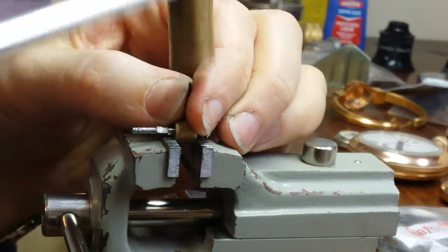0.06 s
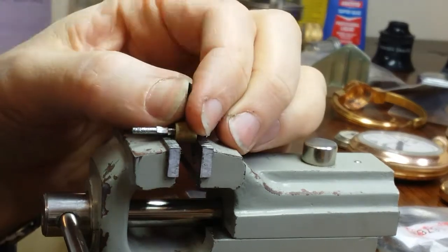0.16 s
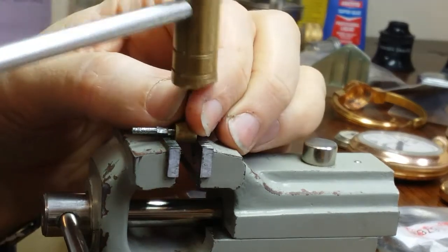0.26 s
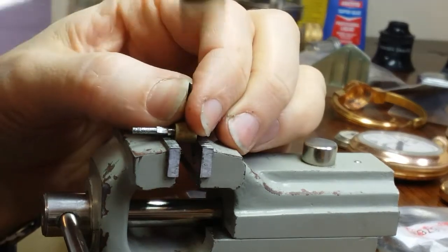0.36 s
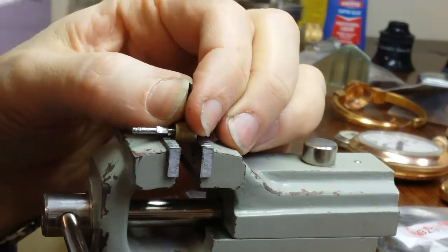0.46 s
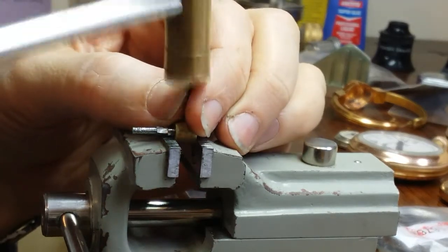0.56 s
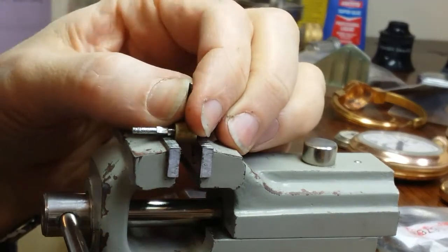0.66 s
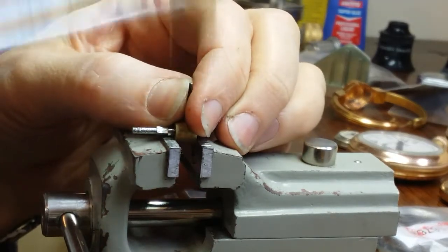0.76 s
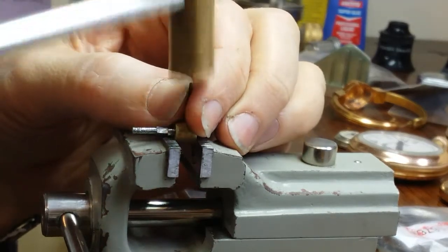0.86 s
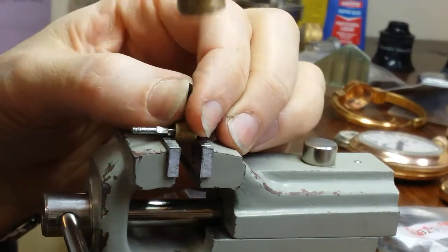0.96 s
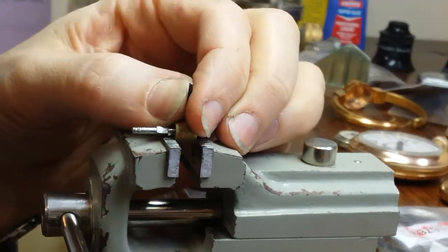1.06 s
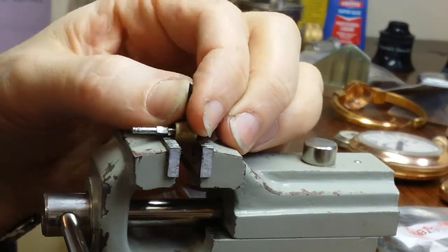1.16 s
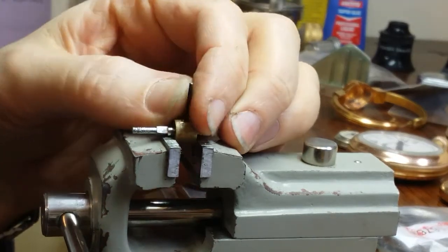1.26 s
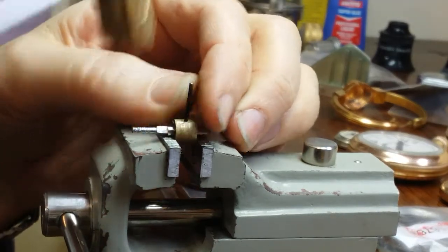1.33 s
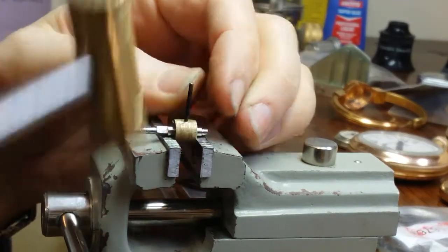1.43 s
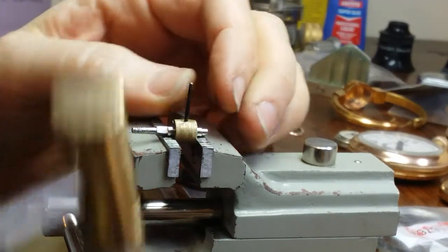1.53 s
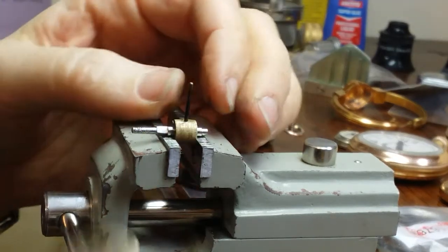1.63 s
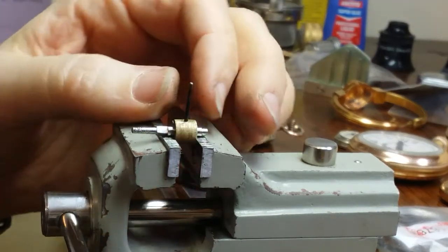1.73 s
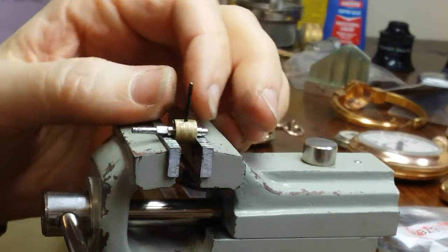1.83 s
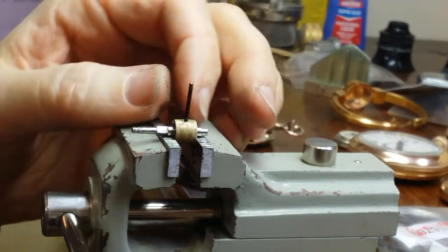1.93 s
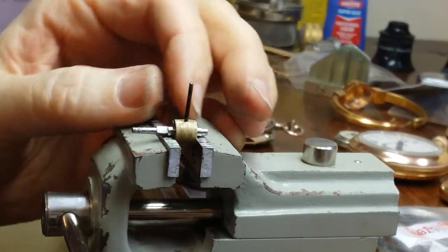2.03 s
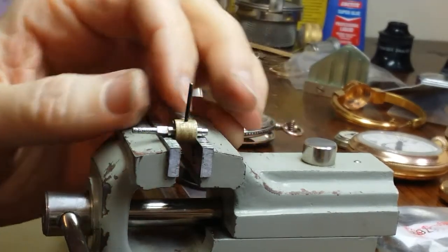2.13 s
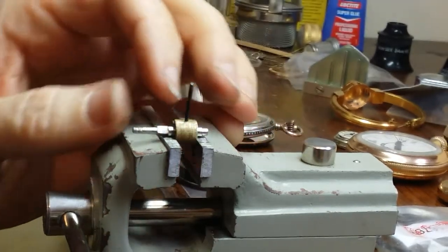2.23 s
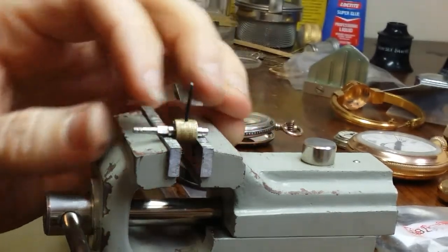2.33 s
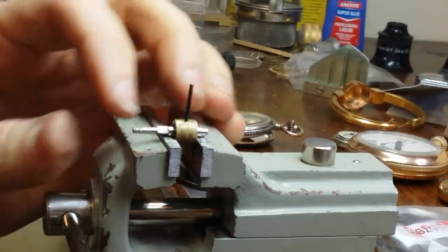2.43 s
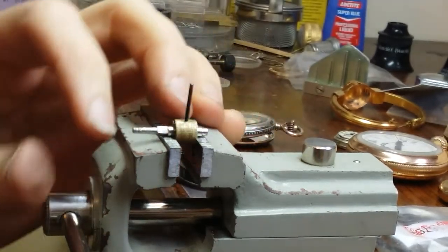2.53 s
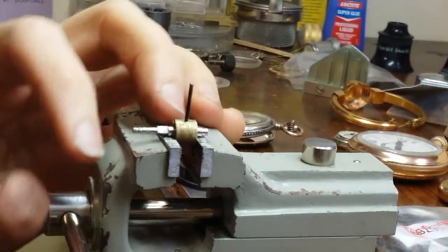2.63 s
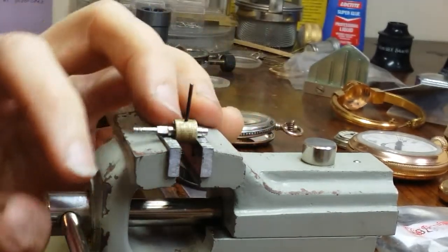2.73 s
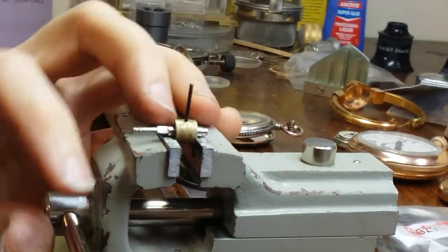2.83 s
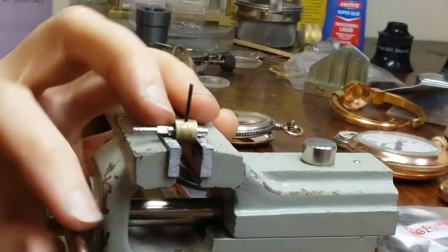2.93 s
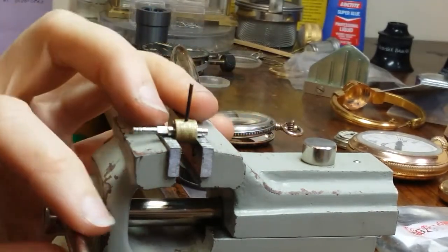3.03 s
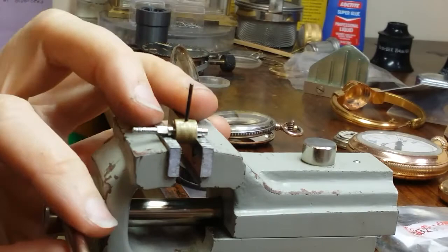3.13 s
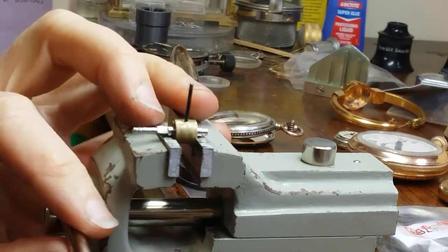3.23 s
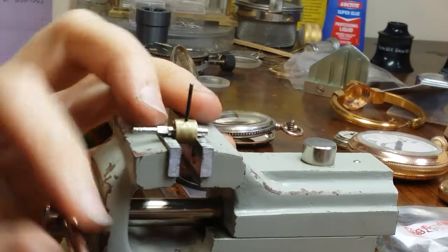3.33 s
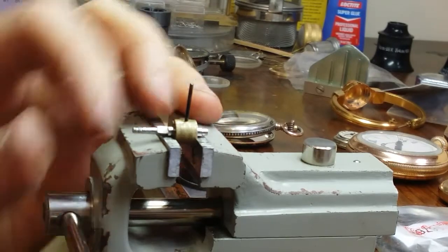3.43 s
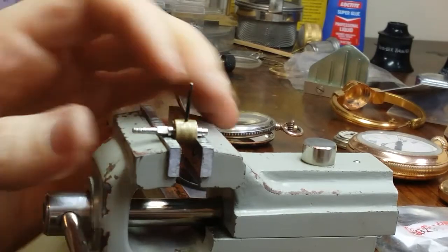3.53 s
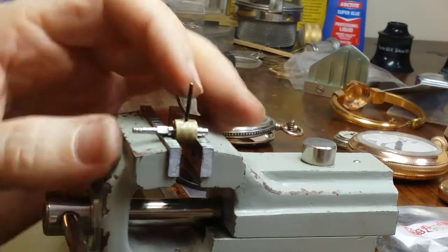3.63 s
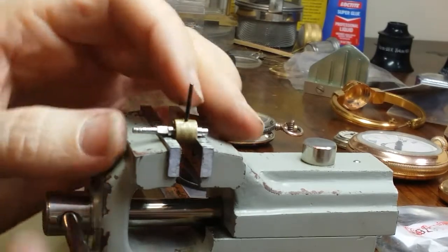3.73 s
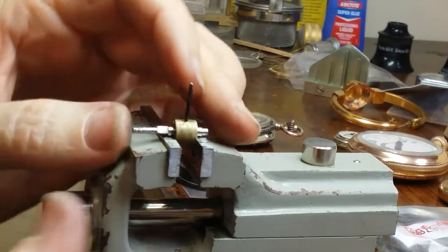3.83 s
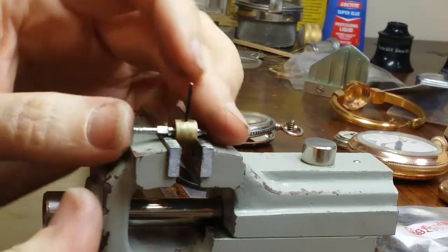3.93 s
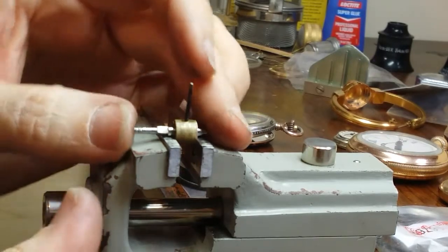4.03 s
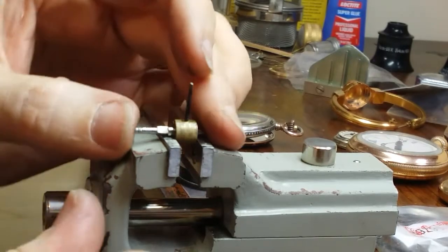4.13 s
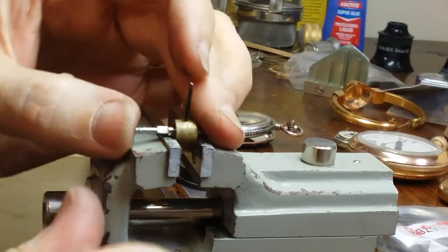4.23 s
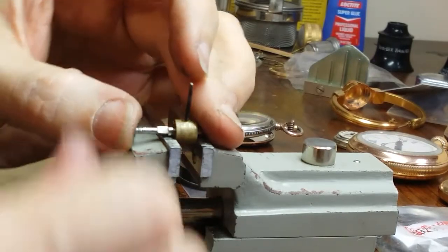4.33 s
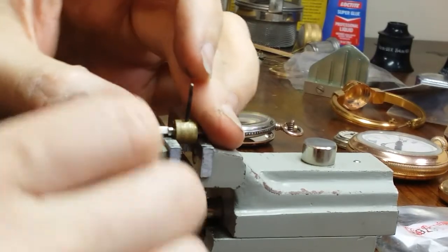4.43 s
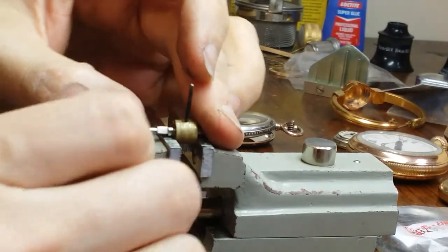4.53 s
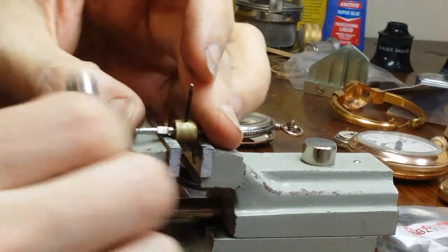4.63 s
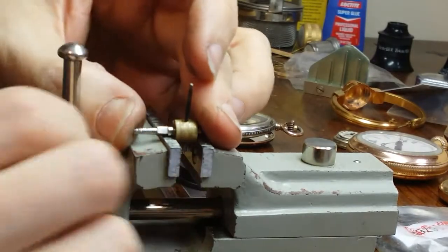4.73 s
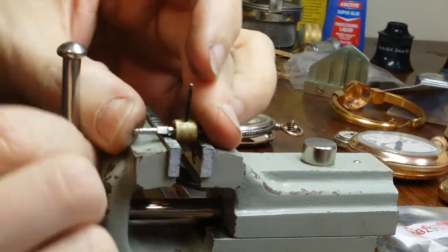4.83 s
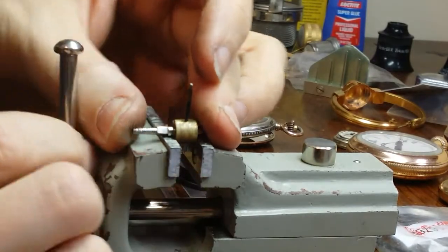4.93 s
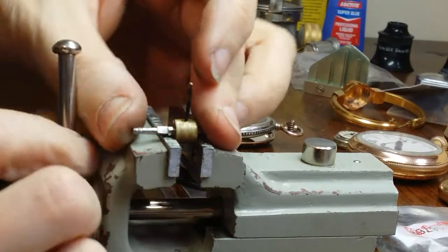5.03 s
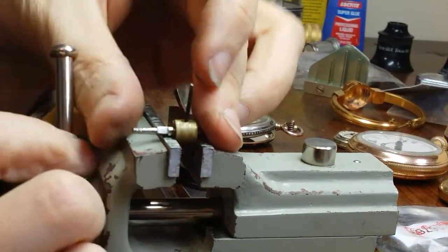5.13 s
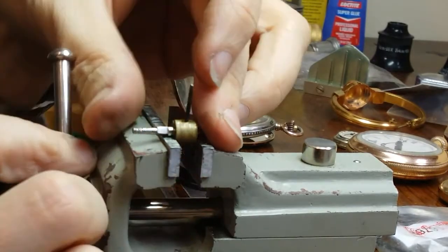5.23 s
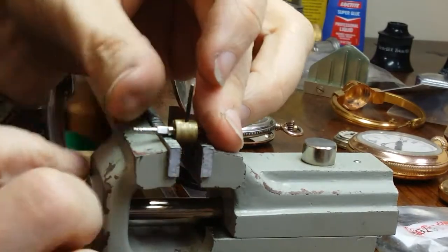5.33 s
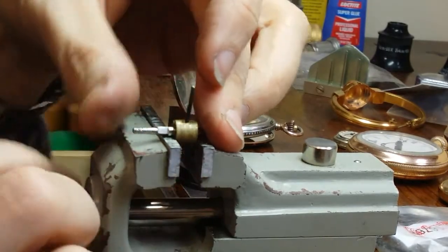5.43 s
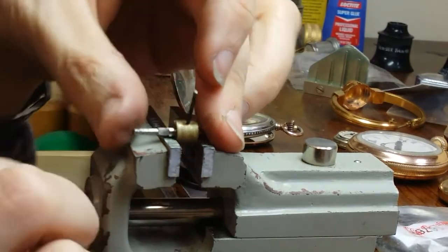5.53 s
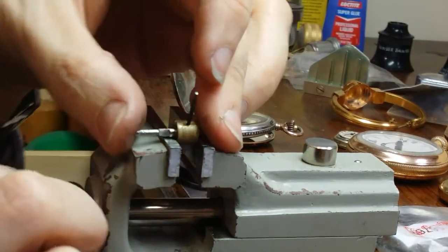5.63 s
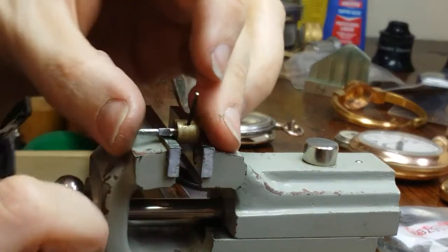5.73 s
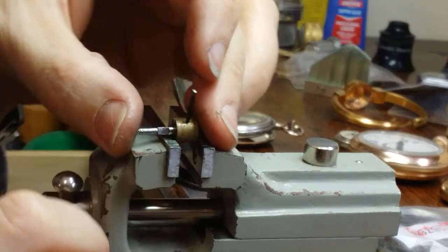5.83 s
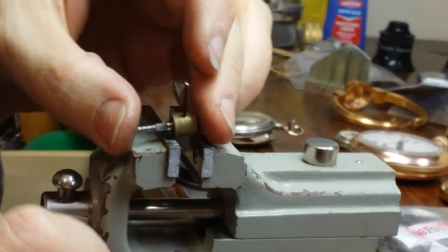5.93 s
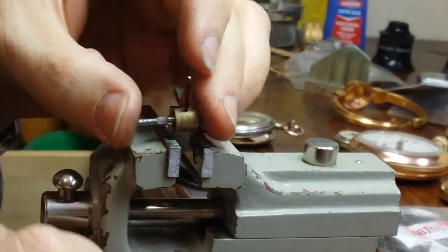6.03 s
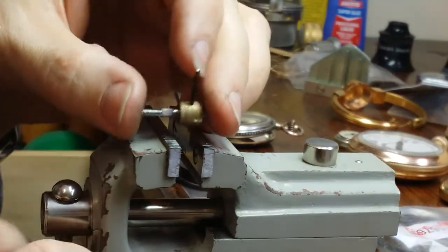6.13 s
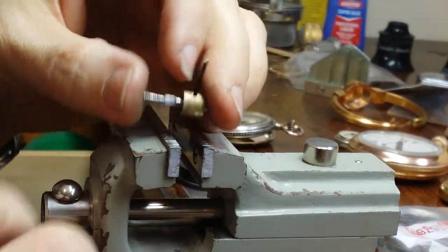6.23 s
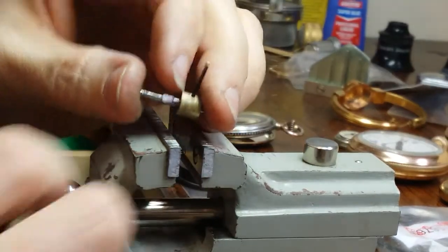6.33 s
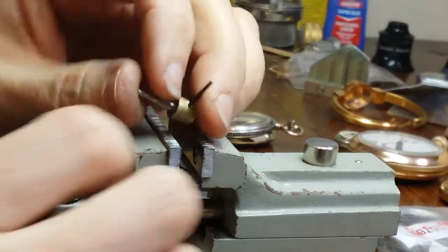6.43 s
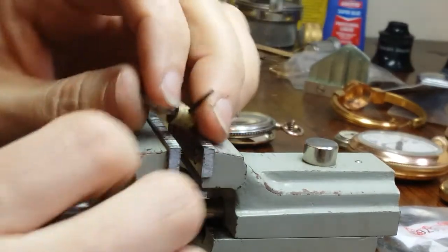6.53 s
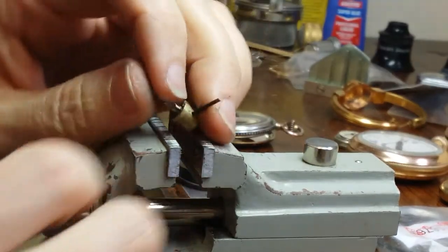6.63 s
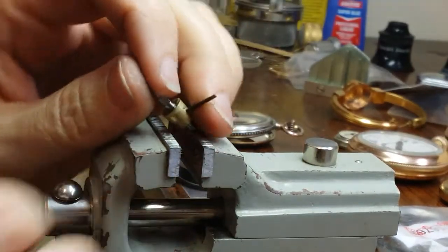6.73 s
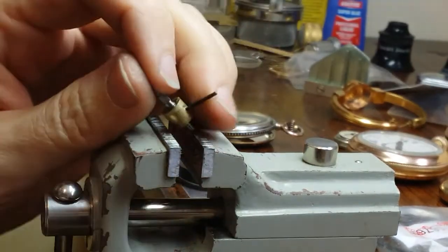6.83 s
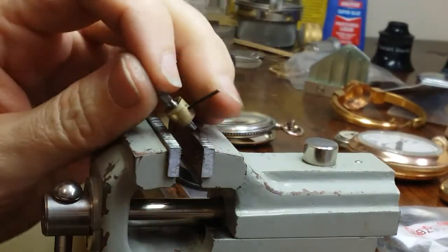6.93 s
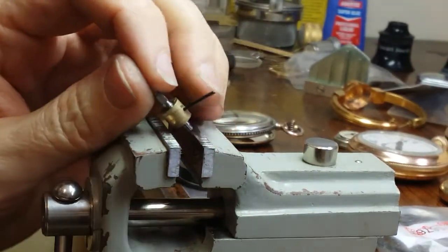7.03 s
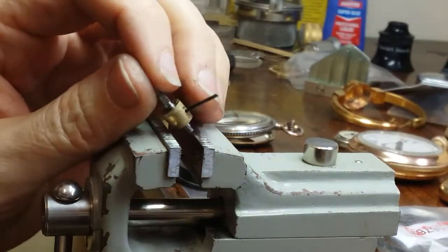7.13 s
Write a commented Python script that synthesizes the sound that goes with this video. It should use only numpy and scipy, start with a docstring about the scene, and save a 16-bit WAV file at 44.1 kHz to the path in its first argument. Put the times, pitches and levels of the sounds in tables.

```python
"""A small, dry, quiet room: a bench vise close in front of two microphones, a watch ticking faintly nearby.
A brass hammer taps a steel pin into a brass part on the vise, and the bench rings under each blow.
Then the vise is opened: its sliding handle clinks at its stops, the screw knocks, the jaws click,
fingertips brush the metal and the part slips free with a ping.
Each contact is a noisy push that excites broad spectra and dying sines; noise makes room, rumble and hiss."""
import sys
import numpy as np
from scipy import signal
from scipy.fft import rfft, irfft, next_fast_len
from scipy.io import wavfile

SR = 44100
rng = np.random.default_rng(int(sys.argv[2]) if len(sys.argv) > 2 else 0)


def wav_record(signal):
    """Record a signal, one row per channel, as 16-bit PCM in the file named by sys.argv[1]."""
    frames = np.transpose(np.atleast_2d(signal))
    bounded = np.clip(frames, -1, 1)
    # unit amplitude maps onto the largest positive 16-bit level
    quanta = np.round(bounded * 32767).astype(np.int16)
    wavfile.write(sys.argv[1], SR, quanta)


N = 316197


def gain_of(db):
    """Decibels to an amplitude factor."""
    return 10 ** (np.asarray(db) / 20)


def read(points, hz):
    """Value of a table at hz, interpolated on a log-frequency axis."""
    f, value = np.transpose(points)
    return np.interp(np.log(hz + 1), np.log(f + 1), value)


def bins(size):
    """Frequencies in Hz of a spectrum of size samples."""
    return np.fft.rfftfreq(size, 1 / SR)


def causal(db):
    """Minimum-phase impulse response with this gain in dB: the most compact one-sided one."""
    cepstrum = irfft(db * np.log(10) / 20)
    half = cepstrum.shape[-1] // 2
    # fold the negative-time half onto the positive one
    cepstrum[..., 1:half] *= 2
    cepstrum[..., half + 1:] = 0
    return irfft(np.exp(rfft(cepstrum)))


def colour(points, size=2048):
    """Impulse response of a table of f/Hz, level/dB."""
    return causal(read(points, bins(size)))


def through(x, response):
    """Passes sound through an impulse response, channel by channel."""
    convolved = signal.oaconvolve(np.atleast_2d(x), np.atleast_2d(response), axes=1)
    return convolved[:, :x.shape[-1]]


def whiten(x, size):
    """Gives a burst unit gain on average: over fixed bands in the bass, wider ones higher up."""
    total = np.cumsum(abs(rfft(x)) ** 2, axis=-1)
    k = np.arange(total.shape[-1])
    reach = size + k // 8  # bins to either side
    below = np.maximum(k - reach, 0)
    above = np.minimum(k + reach, k[-1])
    power = (total[:, above] - total[:, below]) / (above - below)
    return through(x, causal(-10 * np.log10(power + 1e-12)))


# How alike diffuse sound is at the two microphones: f/Hz, likeness (1 = identical)
MICROPHONE_LIKENESS = [(60, 0.88), (290, .9), (640, .55), (1400, 0.021), (15000, 0.0079)]


def noise_pair(size):
    """White noise at two nearby microphones: alike in the bass, nearly unrelated in the treble."""
    left, other = rfft(rng.standard_normal((2, size)))
    same = np.clip(read(MICROPHONE_LIKENESS, bins(size)), -1, 1)
    right = same * left + np.sqrt(1 - same ** 2) * other
    return irfft(np.array([left, right]), size)


def add(mix, s, sound):
    """Adds a sound to the mix at s seconds."""
    part = mix[:, max(round(s * SR), 0):][:, :sound.shape[1]]
    part += sound[:, :part.shape[1]]


def high_pass(x, hz):
    """Second-order bass roll-off."""
    return signal.lfilter(*signal.butter(2, hz, "high", fs=SR), x)


def contact(length_s, size=4096):
    """One smooth push in the bass, with the chatter of metal on metal above it."""
    u = np.arange(size) / SR / length_s
    chatter = whiten(noise_pair(size) * (u * np.exp(-u)) ** 1.2, size=8)
    split_hz = min(1 / length_s, SR / 10)
    impulse = np.arange(size) == 0
    push = signal.lfilter(*signal.butter(2, split_hz, fs=SR), impulse)
    return push + high_pass(chatter, split_hz)


def contacts(rows, size=4096):
    """Force of a row of contacts, each with its own strength, bass and treble shelves and length."""
    force, hz = np.zeros((2, N)), bins(size)
    low = 1 / (1 + (hz / 400) ** 2)
    high = hz ** 2 / (hz ** 2 + 5500 ** 2)
    for s, db, bass_db, treble_db, length_s in rows:
        shape = causal(db + bass_db * low + treble_db * high)
        add(force, s, through(contact(max(length_s, 1e-4)), shape))
    return force


def mode(hz, db, t60, phase=0, size=24000):
    """A dying sine whose resonance peaks at db; it falls by 60 dB in t60 seconds."""
    t = np.arange(size) / SR
    damping = np.log(1000) / t60
    level = gain_of(db) * 2 * damping / SR
    return level * np.exp(-damping * t) * np.sin(2 * np.pi * hz * t + phase)


def struck(force, spectrum, modes=()):
    """A touched or struck part: a broad crack plus any ringing modes."""
    ring = sum(mode(*row) for row in modes)
    return through(force, colour(spectrum, size=24000) + ring)


def leftward(x, db):
    """Makes the left channel louder by db than the right, relative to how it came in."""
    return x * gain_of([[db / 2], [-db / 2]])


# Decay of the room: f/Hz, t60/s
ROOM_DECAY = [(100, 0.26), (300, 0.13), (1000, .21), (4000, 0.19), (9000, 0.16), (14000, 0.21)]
# Tone of the room's reflections: f/Hz, level/dB
ROOM_TONE = [(100, 6.5), (500, 2), (2000, -2), (6000, 1.5), (10000, -2.5), (14000, -5.5)]


def room_tail(size=16384, hold_s=.016, rise_s=.005):
    """Dense reflections from the crowded bench and near walls; each band dies at its own speed."""
    hz, t, bands = signal.stft(noise_pair(size), SR, nperseg=256)
    fade_db = -60 * np.maximum(t - hold_s, 0) / read(ROOM_DECAY, hz)[:, None]
    tail = signal.istft(bands * gain_of(fade_db), SR, nperseg=256)[1][:, :size]
    tail *= 1 - np.exp(-(np.arange(size) / SR / rise_s) ** 2)
    return through(whiten(tail, size=6), colour(ROOM_TONE))


# Direct path; small things radiate little bass: f/Hz, level/dB
DIRECT_PATH = [(80, -16), (400, -8), (1200, -3.5), (3000, 0), (14000, 0.5)]


def in_room(x, tail, wet_db):
    """Direct sound plus the room's answer, scaled by wet_db."""
    direct = colour(DIRECT_PATH, size=tail.shape[1])
    return through(x, direct + gain_of(wet_db) * tail)


def steady(noise, spectrum):
    """White noise coloured to a table of dB per Hz."""
    return through(noise, colour(spectrum, size=4096))[:, :N] * np.sqrt(SR / 2)


# Low rumble of the room before it enters the microphones: f/Hz, level/dB per Hz
ROOM_RUMBLE = [(20, -110), (40, -104), (65, -93), (130, -98), (260, -98.5), (420, -106), (800, -112.5),
               (2000, -122), (15000, -140)]


def rumble():
    """Steady low noise, nearly the same at both microphones."""
    return steady(noise_pair(next_fast_len(N, True)), ROOM_RUMBLE)


# Tone of the watch's beat: f/Hz, level/dB
WATCH_TONE = [(300, -30), (2000, -12), (5000, -9), (7500, -6.5), (8800, 1), (9600, -7.5), (12000, -7),
              (14500, -8)]


def watch(tail, tick_db=-34, spread_db=-0.2, contact_s=0.0024):
    """Faint contacts, five beats a second, tick and tock slightly out of step."""
    beat_s, first_tick_s, first_tock_s = .2, .0075, .2045
    starts = (first_tick_s, first_tock_s)
    times = np.concatenate([np.arange(first, N / SR, 2 * beat_s) for first in starts])
    beats = [(s, tick_db + spread_db * rng.standard_normal(), 0, 0, contact_s) for s in times]
    return in_room(struck(contacts(beats), WATCH_TONE), tail, wet_db=0.5)


# General level of the many weak bench modes: f/Hz, level/dB
WEAK_MODE_LEVEL = [(85, -12), (170, -12.5), (300, -15.5), (700, -15), (1300, -13), (2500, -13)]


def weak_modes(count=36, lowest_hz=85, highest_hz=2500, side_spread_db=3):
    """Modes scattered evenly in pitch, each louder on one side by chance."""
    places = (np.arange(count) + rng.uniform(.2, .8, count)) / count
    hz = lowest_hz * (highest_hz / lowest_hz) ** places
    side_db = side_spread_db * rng.standard_normal(count)
    return list(zip(hz, read(WEAK_MODE_LEVEL, hz), side_db))


# Strongest modes of vise and bench top together: f/Hz, relative level/dB, left minus right/dB
BENCH_MODES = [(92, -4, -2), (121, -0.5, -3), (182, -11, 0), (378, -5.5, -1.5), (412, -2, 2),
               (525, -2.5, -1), (589, -7, 3), (818, -2, 0), (900, -3, -5), (990, -8, -3), (1320, -10, -7),
               (1831, -8, -8), (1911, 0.5, 3), (2325, -5, -4.5)]
# Decay of the bench: f/Hz, t60/s
BENCH_DECAY = [(92, .27), (120, .17), (200, .24), (450, 0.14), (2300, 0.16)]


def bench(force, ring_db, swell_s, swell_cycles):
    """The blow sinks through the vise into the bench, whose modes swell and die; the low ones swell last."""
    modes = list(BENCH_MODES) + weak_modes()
    response = 0
    for hz, db, side_db in modes:
        phase, offset = rng.uniform(-np.pi, np.pi, 2)
        apart = offset * min(hz / 2800, 1)  # short waves reach the two microphones out of step
        t60 = read(BENCH_DECAY, hz)
        left = mode(hz, db + side_db / 2, t60, phase)
        right = mode(hz, db - side_db / 2, t60, phase + apart)
        age = np.arange(left.size) / SR / (swell_s + swell_cycles / hz)
        response = response + np.array([left, right]) * (1 - np.exp(-age ** 2))
    return gain_of(ring_db) * through(force[0], response)


# Hammer blows on the pin: t/s, strength level/dB, treble level/dB
HAMMER_BLOWS = [(0.0266, 2, -11), (0.3042, 17.5, 1.5), (0.5758, 20.5, -4), (0.8582, 21, -6)]
# Crack of the hammer on the pin: f/Hz, level/dB
HAMMER_CRACK = [(50, -22), (100, -7), (300, -3.5), (900, -2), (2000, -2.5), (3500, -9.5), (5000, -10.5),
                (7500, -6), (10500, -9.5), (12500, -12.5), (14500, -20)]
# Ring of the struck steel: f/Hz, level/dB, t60/s
STEEL_MODES = [(4398, -22, .55), (5030, -1.5, 0.21), (9030, -7, .1), (9700, -8.5, 0.13), (10820, -7.5, .12)]


def hammer(tail, thud_db=7, thud_loss_per_db=.42, contact_s=.00105, contact_s_per_db=.000055):
    """Crack of steel and thud of the bench; harder blows press longer and are more crack than thud."""
    rows = []
    for s, db, treble_db in HAMMER_BLOWS:
        bass_db = thud_db - thud_loss_per_db * db
        rows.append((s, db, bass_db, treble_db, contact_s + contact_s_per_db * db))
    force = contacts(rows)
    crack = in_room(struck(force, HAMMER_CRACK, STEEL_MODES), tail, wet_db=0.0)
    return crack + bench(force, ring_db=12, swell_s=.004, swell_cycles=.8)


# The vise handle meets its stops and bounces: t/s, strength level/dB, treble level/dB, stop (0 or 1)
HANDLE_CLINKS = [(2.8184, 6.5, 2.5, 0), (2.8326, 4.5, 5, 0), (2.8500, -0.5, -7, 0), (2.8540, -1, -10, 0),
                 (3.1420, -7.5, -6, 0), (3.2060, 2, 9, 1), (3.2264, 0.5, 11.5, 1), (3.2425, 0.5, 2, 1)]
# Broad sound of the handle: f/Hz, level/dB
HANDLE_TONE = [(30, -46), (70, -24.5), (150, 3.5), (350, -1.5), (600, 4.5), (1000, 2), (1700, -10.5),
               (3000, -13), (7000, -7.5), (10000, -24), (11600, -11.5), (12600, -68), (14500, -29)]
# Each stop wakes other modes of the handle: f/Hz, t60/s, level at stop 0/dB, level at stop 1/dB
HANDLE_RING = [(3650, .007, 2, -4), (4400, 0.007, -2, -20), (5000, 0.1, -8, 5.5), (5400, .03, -7, -20),
               (7300, 0.012, -6, -5), (8470, .01, 1, 3), (9000, 0.012, 4, 4.5), (10850, 0.025, -20.5, 0),
               (11550, .02, -3.5, -30), (14300, .04, -31, -3)]


def handle(tail, thud_db=-1, thud_loss_per_db=.4, contact_s=.0013):
    """The loose handle, toward the left, rings differently at its two stops; softer touches have more thud."""
    clinks = 0
    for stop in range(2):
        rows = []
        for s, db, treble_db, at in HANDLE_CLINKS:
            if round(at) == stop:
                rows.append((s, db, thud_db - thud_loss_per_db * db, treble_db, contact_s))
        modes = [(hz, levels[stop], t60) for hz, t60, *levels in HANDLE_RING]
        clinks = clinks + struck(contacts(rows), HANDLE_TONE, modes)
    return in_room(leftward(clinks, db=2.5), tail, wet_db=-4.3)


# Dull knocks of the vise screw and of the hand on the vise: t/s, strength level/dB, contact time/s
SCREW_KNOCKS = [(2.945, -6.5, .024), (3.160, -0.5, .012), (3.3041, 12.5, .0045), (3.3212, 13.5, .0025),
                (3.422, -12.5, .0054), (3.480, -15, .0055), (4.385, -24, .01), (4.645, -20.5, .005),
                (4.768, -24.5, .005)]
# Broad sound of the screw: f/Hz, level/dB
SCREW_TONE = [(30, -50), (60, -30), (130, -13), (280, -6), (520, 0), (800, -7), (1600, -13), (2500, -26),
              (3500, -32), (6000, -46), (14000, -75)]
# Ring of the screw: f/Hz, level/dB, t60/s
SCREW_RING = [(520, 1, 0.025)]


def screw(tail, thud_db=4.5, thud_loss_per_db=.43):
    """The screw takes up its slack; the softer the knock, the more bass in its balance."""
    rows = [(s, db, thud_db - thud_loss_per_db * db, 0, length_s) for s, db, length_s in SCREW_KNOCKS]
    return in_room(struck(contacts(rows), SCREW_TONE, SCREW_RING), tail, wet_db=-9.5)


# The brass part shifts between the jaws: t/s, strength level/dB, bass level/dB, treble level/dB
JAW_CLICKS = [(4.192, -32.5, 5, -15), (5.3435, -7, -0.5, 11), (5.5062, -13, -10, -15),
              (5.6092, -21, -9, -13), (5.819, -24, -4, -28), (5.834, -24, -3, -44)]
# Broad sound of the jaws: f/Hz, level/dB
JAW_TONE = [(25, -36), (60, -9), (120, 10), (400, 5), (800, 2), (1700, -4), (2700, -2.5), (4000, -7.5),
            (7000, -4.5), (9200, -16), (11000, -34), (14000, -25)]
# Ring of the jaws: f/Hz, level/dB, t60/s
JAW_RING = [(1050, -4, .008), (1640, 2, .014), (2750, 2, .008), (9170, -5, 0.053)]


def jaws(tail, click_s=.0019):
    """The part shifts between the jaws: short contacts wake brief modes."""
    shifts = contacts([(*row, click_s) for row in JAW_CLICKS])
    return in_room(struck(shifts, JAW_TONE, JAW_RING), tail, wet_db=-4.5)


# Fingertips brush the metal: t/s, strength level/dB, treble level/dB
FINGER_RUBS = [(4.405, -30.5, -5), (5.965, -30, -16), (6.405, -31, -3), (6.770, -27, 8), (6.933, -25, -13),
               (7.056, -24.5, -6.5)]
# Tone of skin on metal: f/Hz, level/dB
SKIN_TONE = [(200, 2), (1500, -5), (2200, -3), (2700, 4), (3500, -7.5), (5000, -1.5), (8000, -5.5),
             (14000, -34)]


def fingers(tail, rub_s=.014, rub_bass_db=3):
    """The part is turned in the fingers: longer, soft contacts without ringing modes."""
    strokes = contacts([(s, db, rub_bass_db, treble_db, rub_s) for s, db, treble_db in FINGER_RUBS])
    return in_room(struck(strokes, SKIN_TONE), tail, wet_db=-11.5)


# The part slips off the jaw: t/s, strength level/dB, bass level/dB, treble level/dB, contact time/s
PART_SLIPS = [(6.1768, -2.5, -7.5, 3.5, 0.0038)]
# Broad sound of the part: f/Hz, level/dB
PART_TONE = [(25, -40), (60, 2), (125, 14), (250, 4), (400, 11.5), (620, -5), (1600, 4.5), (3300, -9),
             (6500, -3.5), (10000, -7), (12700, 0.5), (14500, -40)]
# Ring of its pin: f/Hz, level/dB, t60/s
PIN_RING = [(2070, -5, 0.0032), (4350, 6, 0.008), (6800, -3.5, 0.0052), (11830, 20.5, 0.04)]


def slip(tail):
    """The part slips free, toward the left, and its pin rings with a ping."""
    ping = struck(contacts(PART_SLIPS), PART_TONE, PIN_RING)
    return in_room(leftward(ping, db=2), tail, wet_db=-7.5)


def scene():
    """All sources at the two microphones, with one room tail for the contacts and a low rumble."""
    tail = room_tail()
    vise = handle(tail) + screw(tail)
    brass_part = jaws(tail) + fingers(tail) + slip(tail)
    return rumble() + watch(tail) + hammer(tail) + vise + brass_part


# Each microphone's port has its own resonance: f/Hz, level/dB
LEFT_PORT = [(100, 0), (500, 0.5), (2000, -3.5), (3600, -2.5), (4700, 1), (6300, -6), (7800, -3.5),
             (8750, 6.5), (9350, 7), (10000, 2.5), (12000, 0.5), (14500, -2)]
RIGHT_PORT = [(100, 1), (500, 0.5), (2000, -0.5), (4700, 2), (6800, 3.5), (8000, -1.5), (9000, -0.5),
              (10000, -3), (12000, -1), (14500, 0.5)]
# Self-noise of each microphone: f/Hz, level/dB per Hz
LEFT_HISS = [(100, -112), (1500, -113), (4000, -116), (7000, -119), (9200, -114), (11000, -117),
             (14500, -118)]
RIGHT_HISS = [(100, -112), (1500, -113), (3500, -113), (5000, -109), (6800, -100), (8100, -110),
              (10000, -112), (11000, -115), (14500, -113)]


def record(dry, low_cut_hz=55, edge_hz=14750):
    """The two microphones: bass roll-off, port resonances, self-noise and the band limit."""
    thinned = high_pass(dry, low_cut_hz)
    heard = through(thinned, [colour(LEFT_PORT), colour(RIGHT_PORT)])
    hiss = np.vstack([steady(rng.standard_normal(N), spectrum) for spectrum in (LEFT_HISS, RIGHT_HISS)])
    low_pass = signal.firwin(301, edge_hz, window=("kaiser", 8), fs=SR)
    return signal.oaconvolve(heard + hiss, low_pass[None], "same", axes=1)


dry = scene()
out = record(dry)
wav_record(out)
```